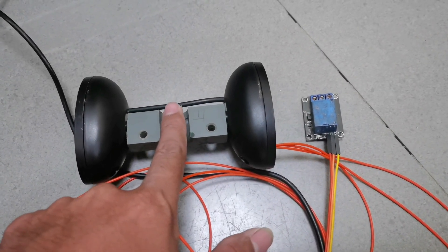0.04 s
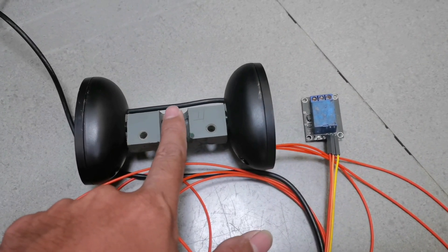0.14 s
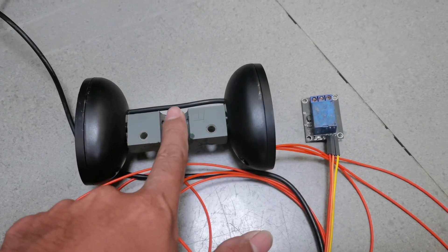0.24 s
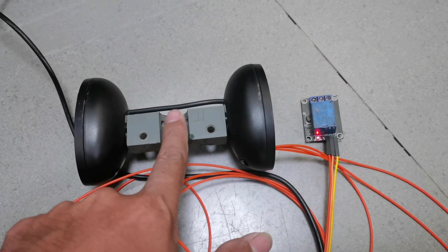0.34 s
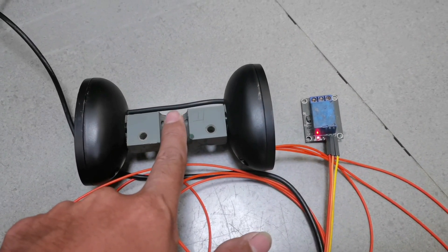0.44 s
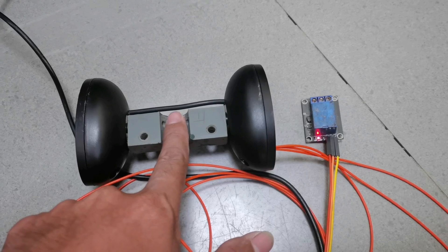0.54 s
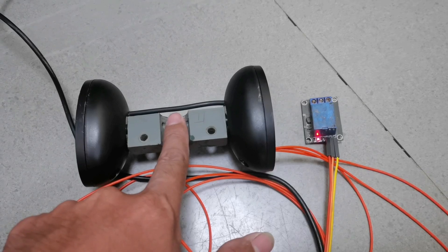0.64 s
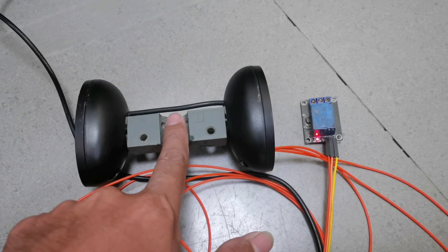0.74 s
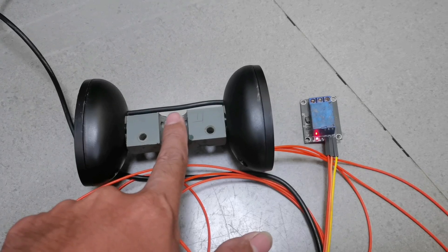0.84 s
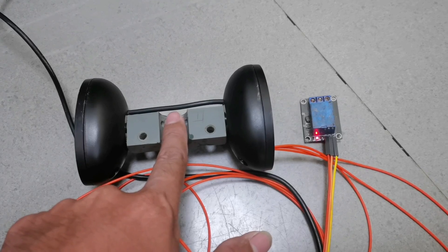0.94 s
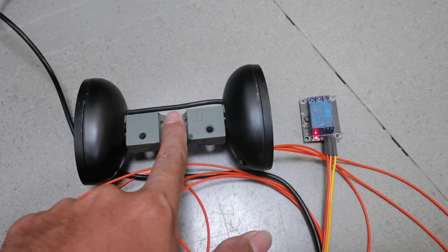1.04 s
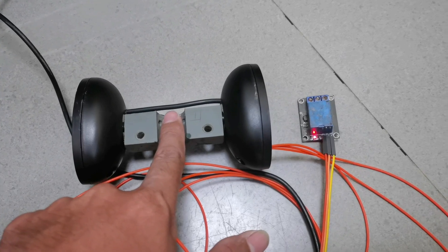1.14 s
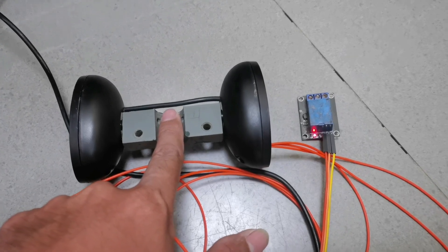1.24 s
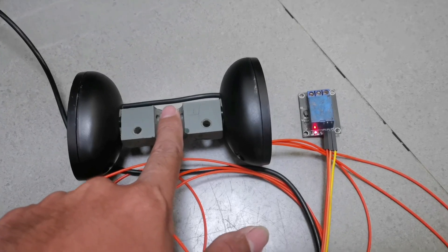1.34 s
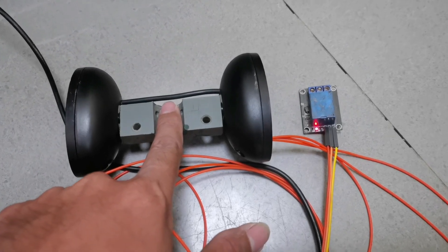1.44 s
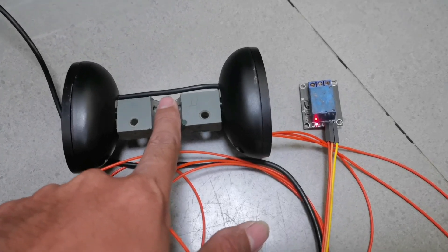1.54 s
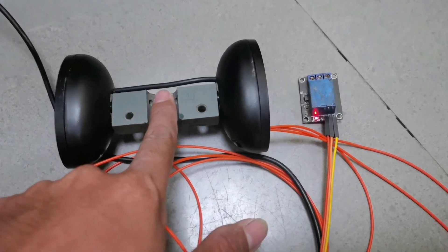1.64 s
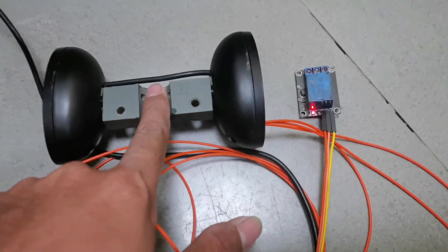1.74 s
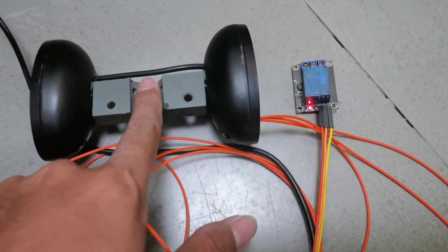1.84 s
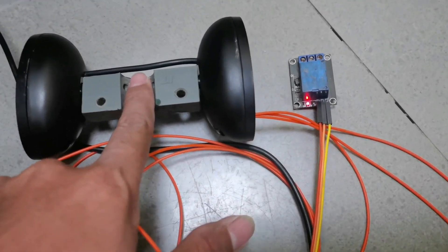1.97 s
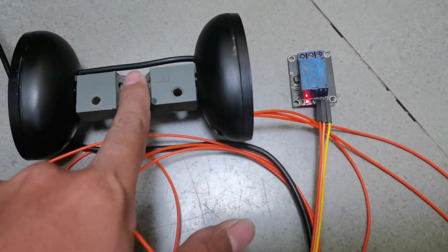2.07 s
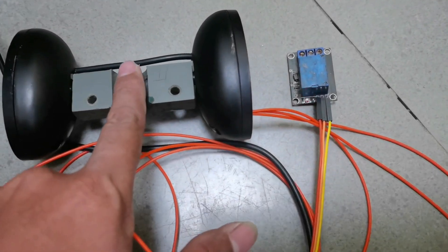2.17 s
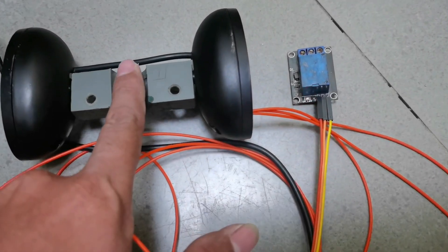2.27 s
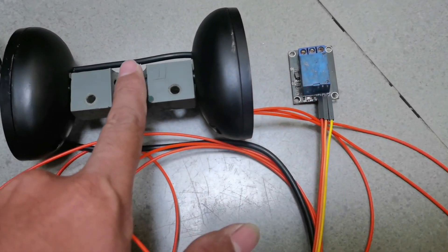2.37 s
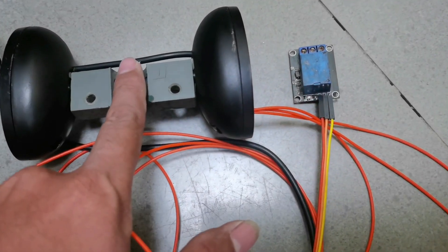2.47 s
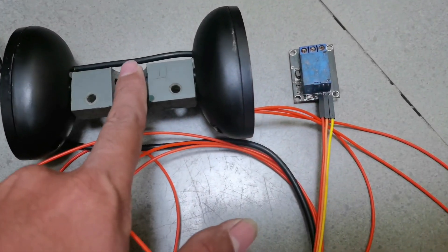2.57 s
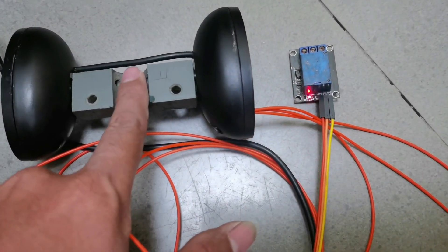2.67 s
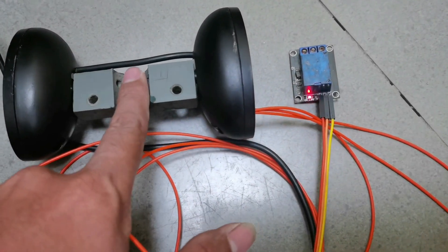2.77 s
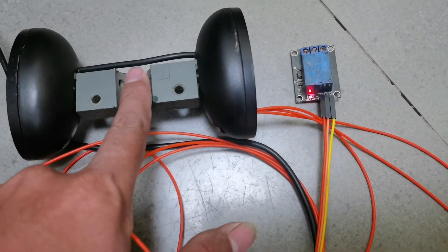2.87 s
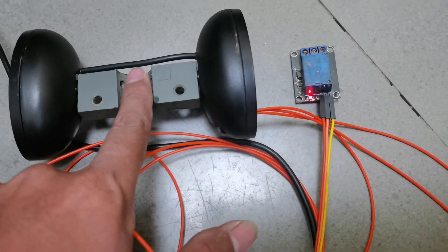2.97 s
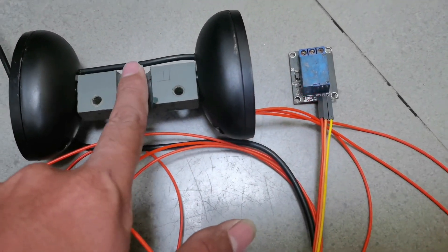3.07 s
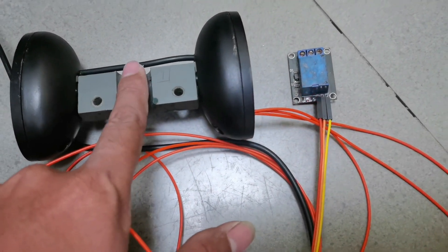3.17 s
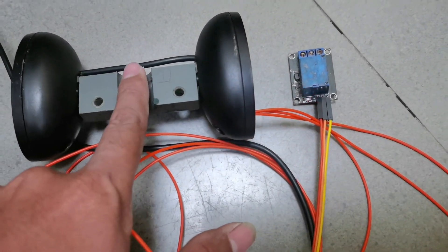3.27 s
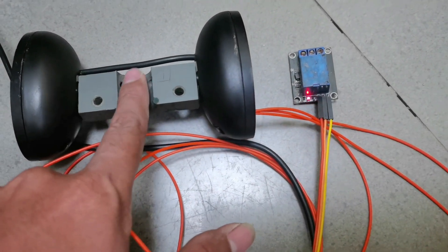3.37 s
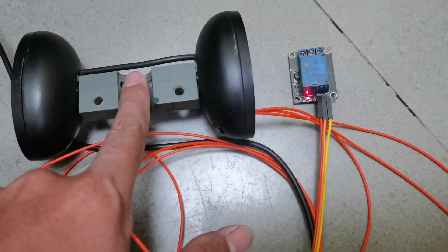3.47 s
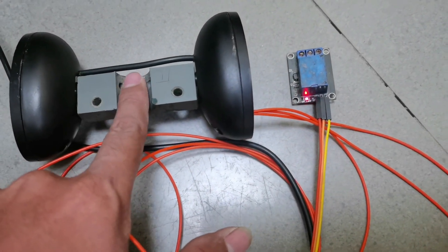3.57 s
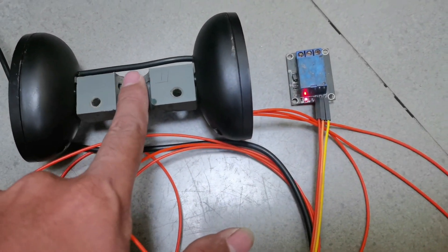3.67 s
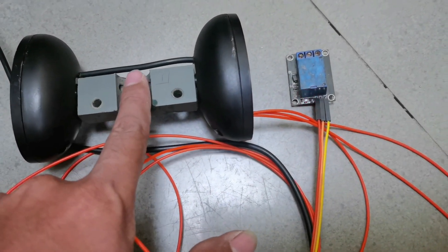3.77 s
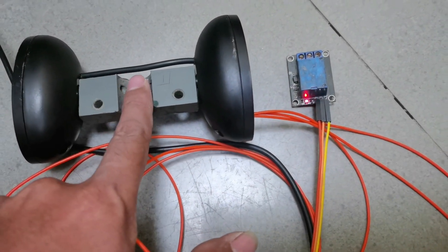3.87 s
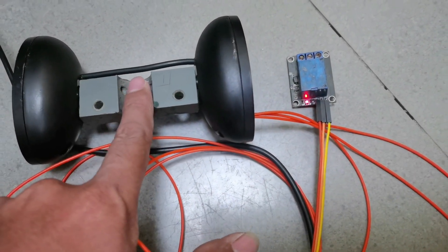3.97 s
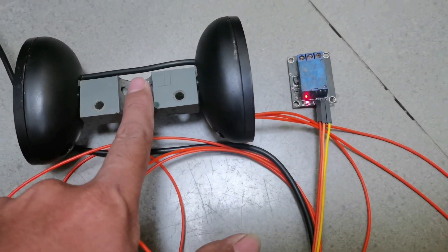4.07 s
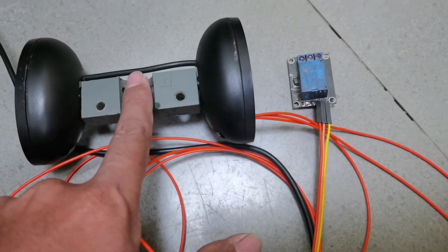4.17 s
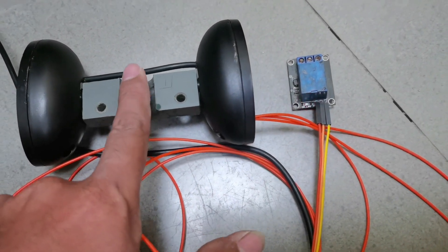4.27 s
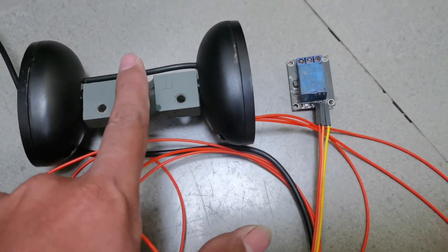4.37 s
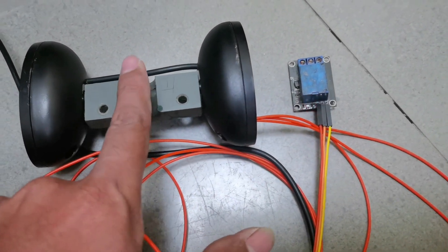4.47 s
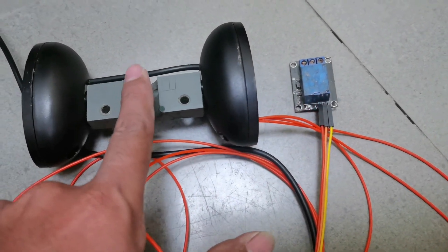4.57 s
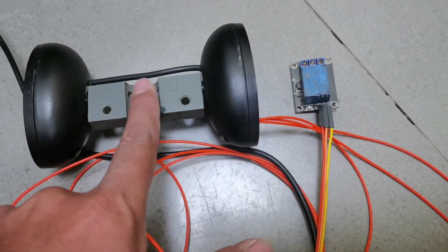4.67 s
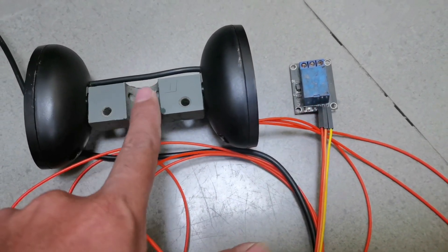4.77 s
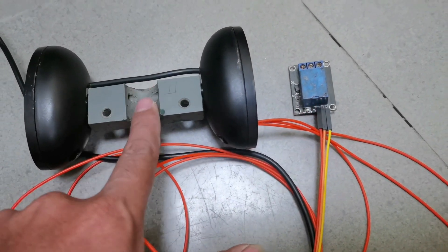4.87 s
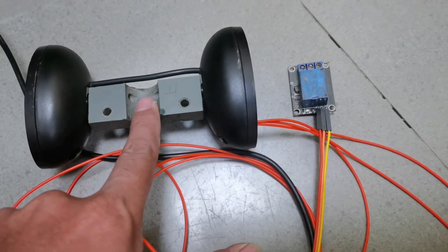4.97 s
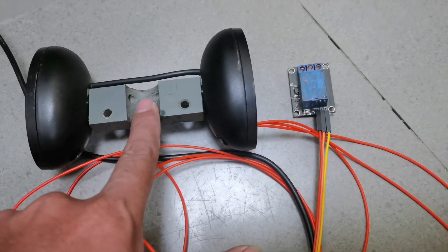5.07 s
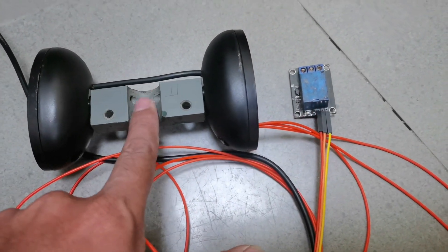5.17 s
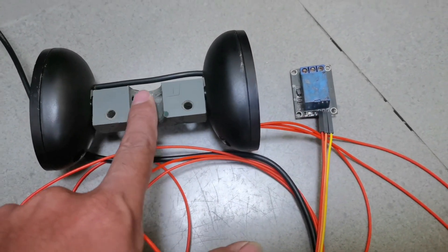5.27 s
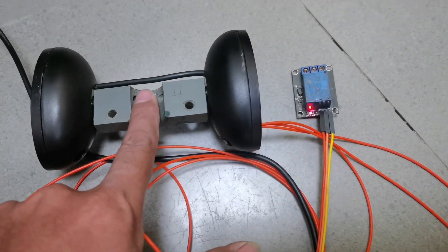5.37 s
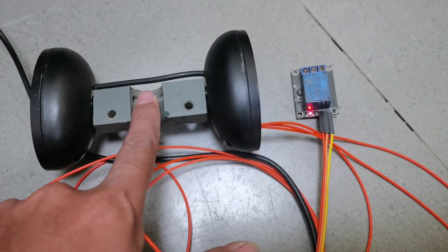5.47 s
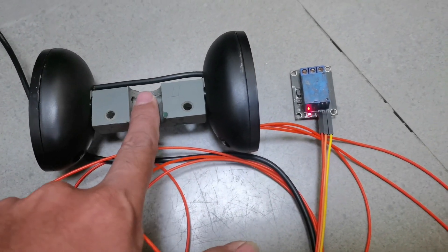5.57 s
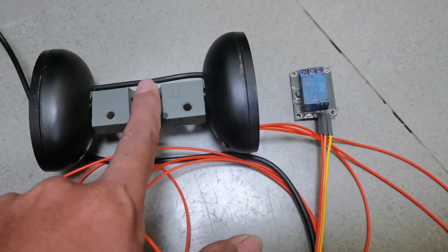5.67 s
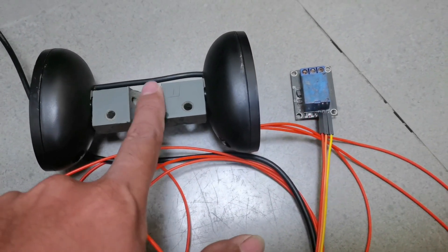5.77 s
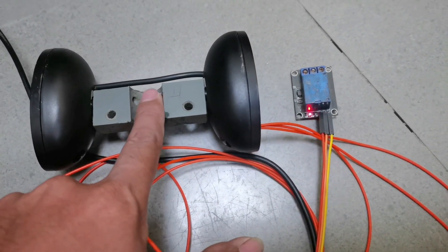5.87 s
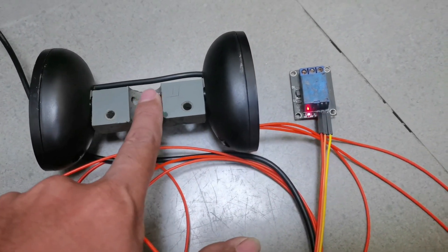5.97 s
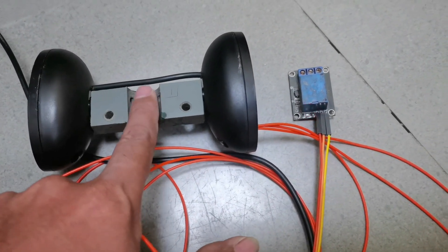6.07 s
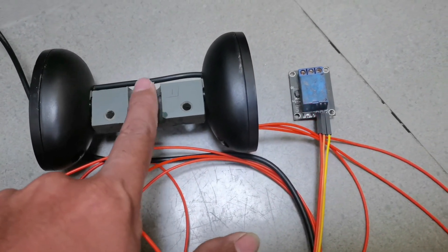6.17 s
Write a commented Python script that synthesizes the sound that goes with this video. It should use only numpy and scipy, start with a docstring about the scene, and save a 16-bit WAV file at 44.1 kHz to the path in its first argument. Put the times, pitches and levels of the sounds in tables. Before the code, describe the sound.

A small relay clicks on and off at uneven intervals in a hard room, over faint rumble and distant traffic.

```python
"""A hard room with a tiled floor, where a small relay is switched on and off from a device wired to it.
Pulling in, the armature hits the core with one sharp snap; let go, it springs back and chatters on
the contacts. Each click rings out in the room, and one faint tick comes from further off.
Underneath lie a low rumble, a wavering drone and the slow swell of distant traffic."""
import sys
import numpy as np
from scipy import signal
from scipy.fft import rfft, irfft, next_fast_len
from scipy.io import wavfile

SR = 44100
rng = np.random.default_rng(int(sys.argv[2]) if len(sys.argv) > 2 else 0)


def dump_mix(stems):
    """Bounce the given channels to the path in sys.argv[1] as a 16-bit WAV at rate SR."""
    frames = np.atleast_2d(stems).T  # one column per channel
    limited = np.clip(frames, -1, 1)  # hard clip at full scale
    pcm = np.round(limited * 32767).astype(np.int16)
    wavfile.write(sys.argv[1], SR, pcm)


N = 274169


def from_db(db):
    """Decibels to gain."""
    return 10 ** (np.asarray(db) / 20)


def rms_one(x):
    """Scale to unit power."""
    return x / np.sqrt(np.mean(x ** 2) + 1e-20)


def in_time(rows):
    """Each column of an automation curve at every sample."""
    s, *columns = np.transpose(rows)
    return [np.interp(np.arange(N) / SR, s, c) for c in columns]


def at_hz(rows, hz):
    """Each column of a table, read on a log-frequency axis."""
    points, *columns = np.transpose(rows)
    return [np.interp(np.log(hz), np.log(points), c) for c in columns]


def pan(db):
    """Left and right gains for a balance in dB; positive leans left."""
    return from_db(np.array([[.5], [-.5]]) * db)


def add(out, sound, s):
    """Mix a stereo sound in at a time."""
    start = max(round(s * SR), 0)
    out[:, start:start + sound.shape[1]] += sound[:, :max(out.shape[1] - start, 0)]


def poles(hz, width_hz):
    """Denominator of a damped resonance."""
    r = np.exp(-np.pi * width_hz / SR)
    return np.array([1, -2 * r * np.cos(2 * np.pi * hz / SR), r * r])


def resonate(x, hz, width_hz):
    """A resonance with unity gain at its peak."""
    a = poles(hz, width_hz)
    return signal.lfilter(np.array([1, 0, -1]) * (1 - a[2]) / 2, a, x)


def drift(rate_hz):
    """Slow random wander with a spread of 1."""
    step, run_in = 40, 2000
    r = np.exp(-2 * np.pi * step * rate_hz / SR)
    white = rng.standard_normal(N // step + run_in + 2)
    slow = signal.lfilter([1], [1, -2 * r, r * r], white)[run_in:]
    return np.interp(np.arange(N) / step, np.arange(len(slow)), rms_one(slow))


def air_noise(spectrum):
    """A diffuse noise bed of a given colour at unit power: narrow in the bass, wide in the treble."""
    # Stereo image of the ambience. Each row: frequency in Hz, likeness from -1 to 1, balance in dB.
    image = [(40, 0.81, 0), (150, 0.91, 4), (300, .8, 4), (678, 0.62, 3.5), (1270, -0.15, 1),
             (2647, 0.012, -5.5), (4040, -0.079, -11), (6000, 0, -0.5), (14430, -0.26, -2)]
    hz = np.maximum(np.fft.rfftfreq(next_fast_len(N), 1 / SR), 1)
    alike, balance_db = at_hz(image, hz)
    octaves_outside = np.abs(np.log2(hz / np.clip(hz, spectrum[0][0], spectrum[-1][0])))
    colour = from_db(at_hz(spectrum, hz)[0] - 60 * octaves_outside)
    mid, side = rfft(rng.standard_normal((2, next_fast_len(N))))
    pair = np.sqrt(1 + alike) * mid + np.sqrt(1 - alike) * side * [[1], [-1]]
    return rms_one(irfft(pair * colour * pan(balance_db))[:, :N])


def room_tone():
    """A steady deep rumble under the room's low drone, which wavers at random."""
    # Colours of the rumble and the drone. Each row: frequency in Hz, relative density in dB.
    rumble_colour = [(22, -8), (41, 3), (62, -4), (90, -1.5), (122, -4.5)]
    drone_colour = [(115, -11.5), (150, -0.5), (203, -0.5), (238, -1), (265, -10), (290, -7), (336, -21.5),
                    (420, -19)]
    # The drone's fader ride. Each row: time in seconds, relative level in dB.
    drone_ride = [(0, -49), (1.92, -52), (2.1, -47.5), (2.45, -47.8), (2.92, -53.5), (3.15, -48.5),
                  (4.9, -49.4), (5.7, -48), (6.22, -51)]
    waver_db = 2 * drift(rate_hz=5.7)
    drone_db = in_time(drone_ride)[0] + waver_db + 0.77
    return from_db(-53) * air_noise(rumble_colour) + from_db(drone_db) * air_noise(drone_colour)


def distant_traffic():
    """Roar and tyre hiss swell and fade; a faint top hiss follows the tyres part of the way."""
    # The swells. Each row: time in seconds, relative levels of the roar and of the tyres in dB.
    swells = [(0, -54.5, -63.5), (.5, -51, -56.5), (.85, -53, -56), (1.19, -48.7, -51.5), (1.62, -53, -61),
              (2.13, -53, -64.5), (2.48, -50.5, -55), (2.92, -54, -63.5), (3.15, -52.5, -62),
              (3.62, -52, -58.5), (3.95, -48.7, -54), (4.44, -49.6, -58), (4.7, -51.5, -60.5),
              (4.97, -49, -55), (5.27, -51, -55.5), (5.86, -49, -53), (6.03, -48, -49.5),
              (6.22, -48, -52.5)]
    # Colours of the roar, tyres and top hiss. Each row: frequency in Hz, relative density in dB.
    roar_colour = [(330, -16.5), (420, -10), (510, -6), (640, -5), (722, 0), (790, -3.5), (930, -7.5),
                   (1030, -5.5), (1100, -2), (1190, -4), (1600, -6), (1880, -7.5), (2300, -12.5)]
    tyre_colour = [(1700, -22.5), (2200, -7), (2700, -0.5), (3300, -8), (4200, -7), (4650, -17.5),
                   (5200, -28), (6900, -23), (7450, -16.5), (8100, -25.5), (9100, -21.5), (9600, -46.5)]
    hiss_colour = [(4500, -13.5), (7500, -6), (10000, -5.5), (12800, 2.5), (15600, 0), (16100, -37.5)]
    roar_db, tyre_db = in_time(swells)
    hiss_db = -78.5 + .3 * (tyre_db - tyre_db.mean())
    roar = from_db(roar_db + 2.0) * air_noise(roar_colour)
    tyres = from_db(tyre_db + 3.5) * air_noise(tyre_colour)
    return roar + tyres + from_db(hiss_db) * air_noise(hiss_colour)


def room_response(early_db, early_t60, build_s, size=26000):
    """Dense echoes: near surfaces die quickly, the walls slowly, the treble first."""
    # The reverb. Each row: frequency in Hz, level in dB, seconds to fall 60 dB, balance in dB.
    reverb = [(2520, 8, 0.61, -6), (4210, 8, 0.64, -7.5), (5000, -5, 0.38, 0), (7200, 0, 0.47, -7.5),
              (9100, -7.5, .44, 2.5), (12000, -5.5, 0.29, -0.5), (15500, -4.5, .28, 0.5),
              (16800, -22.5, 0.18, -6)]
    t, out = np.arange(size) / SR, 0
    hz = np.fft.rfftfreq(size, 1 / SR)
    white = rfft(rng.standard_normal((2, size)))
    edges_hz = np.geomspace(1500, 18000, 26)
    for low, high in zip(edges_hz, edges_hz[1:]):
        level_db, t60, side_db = at_hz(reverb, np.sqrt(low * high))
        fade = from_db(-60 * t / t60) + from_db(early_db - 60 * t / early_t60)
        fade = fade * (1 - np.exp(-(t / build_s) ** 2))
        band = irfft(white * ((hz >= low) & (hz < high)))
        out = out + band * fade / np.linalg.norm(fade) * from_db(level_db) * pan(side_db)
    return out


def far_tick():
    """A small hard tick further off, heard through the room's echoes."""
    # The tick's cue. Each row: start in seconds, relative strength in dB.
    cues = [(0.149, 1.5)]
    out = np.zeros((2, N))
    for s, db in cues:
        echoes = room_response(early_db=-25.5, early_t60=.2, build_s=0.0061)
        tick = resonate(echoes, hz=7400, width_hz=920)
        tick = resonate(tick, hz=8800, width_hz=1300)
        add(out, from_db(db) * tick, s)
    return out


def brighten(modes, db_per_octave, pivot_hz=7800):
    """Tilt the modes about a pivot, so a click sounds a little brighter or duller."""
    return [(hz, width, db + db_per_octave * np.log2(hz / pivot_hz), side)
            for hz, width, db, side in modes]


def ring(modes, beaming, vary_db, size=2048):
    """One touch rings every mode; each mode beams to its own side."""
    blow, out = signal.unit_impulse(size), 0
    for k, (hz, width_hz, level_db, side_db) in enumerate(modes):
        gain = (-1) ** k * from_db(level_db + vary_db * rng.normal())
        out = out + gain * pan(beaming * side_db) * resonate(blow, hz, width_hz)
    return out


def click(modes, touches, beaming, lead_s, jitter_s=0.00017, size=2600):
    """One stroke of the armature: a few unevenly spaced touches on the same modes."""
    out, touch = np.zeros((2, size)), ring(modes, beaming, vary_db=1.5)
    for after_s, db in touches:
        slip_s = jitter_s * rng.normal() * (after_s != 0)   # the main blow stays on cue
        add(out, from_db(db) * touch, lead_s + after_s + slip_s)
    return out


def smear(x, hz, width_hz):
    """An all-pass delays the ring around one pitch, spreading the click into a denser snap."""
    a = poles(hz, width_hz)
    return signal.lfilter(np.convolve(a[::-1], a[::-1]), np.convolve(a, a), x)


def relay(strokes, modes, touches, direct_db, wall_db, room_db, smear_width_hz):
    """Each stroke arrives left, then right, then off a close wall on the right and from the room."""
    out = np.zeros((2, N))
    lead_s, right_lag_s, wall_echo_s = .004, .0003, .0026
    for s, db, bright_db in strokes:
        start, struck = s - lead_s, brighten(modes, bright_db)
        near = from_db(db + direct_db) * click(struck, touches, beaming=0.99, lead_s=lead_s)
        near = smear(near, hz=8200, width_hz=smear_width_hz)
        near = smear(near, hz=13210, width_hz=1100)
        left, right = near * [[1], [0]], near * [[0], [1]]
        add(out, left, start)
        add(out, right, start + right_lag_s)
        # a hand-held perspective: the echo path shifts from click to click
        add(out, from_db(wall_db) * right, start + wall_echo_s + rng.uniform(0, 0.00072))
        # the room gathers sound from all directions, so it keeps only part of the beaming
        spread = click(struck, touches, beaming=0.55, lead_s=lead_s)
        room = room_response(early_db=8.5, early_t60=.11, build_s=0.0077)
        add(out, from_db(db + room_db) * signal.fftconvolve(spread, room, axes=1), start)
    return out


def pull_ins():
    """Switching on: the contacts meet softly, then the armature hits the core with one snap."""
    # The snaps. Each row: time in seconds, relative strength in dB, tilt in dB per octave.
    strokes = [(.5516, -2, -0.5), (2.8179, -1.7, 0), (3.5967, -2.4, 1.5), (4.0674, -1.7, 0),
               (5.5869, -2, -1.5), (6.0583, -3.5, 0.5)]
    # The closed relay's ring. Each row: pitch and width in Hz, level and full-beam balance in dB.
    modes = [(4280, 390, -11, 0.5), (5300, 680, 5, 10), (5927, 130, 12.5, 8), (7120, 220, 16.5, -0.5),
             (7640, 373, 16, -4.5), (7890, 122, 20, 18), (8500, 290, 12.5, 14), (9434, 445, 21.5, 5),
             (9590, 830, 15.5, 10), (10950, 1100, 2, -7), (11500, 670, -0.5, 5.5), (12650, 520, 8.5, -1.7),
             (13500, 502, 0.5, 17.5), (15392, 257, 3.5, 4.5)]
    # Contact, then landing. Each row: seconds after the blow, relative level in dB.
    touches = [(-.0019, -25.5), (0, 0.5)]
    return relay(strokes, modes, touches, direct_db=0.0, wall_db=-8.5, room_db=0.5, smear_width_hz=1300)


def drop_outs():
    """Switching off: the armature springs back and chatters on the contacts."""
    # The releases. Each row: time in seconds, relative strength in dB, tilt in dB per octave.
    strokes = [(2.3291, 0.2, -0.5), (3.2403, -.4, 0), (3.9084, -0.5, 1), (4.3358, -0.3, -1.5),
               (5.8416, -1.5, 0)]
    # The open relay's ring. Each row: pitch and width in Hz, level and full-beam balance in dB.
    modes = [(3580, 470, -4, 1.5), (4570, 330, -4.5, -14), (5460, 445, -2.5, 13), (6510, 392, 3, 7.5),
             (6740, 110, 11.5, 2), (7190, 30, 15.5, 0), (7500, 150, 12.5, -19), (7740, 300, 13.5, 17.5),
             (8420, 310, 9.5, 14), (9007, 150, 20.5, 9.5), (9170, 1100, 6, 13), (10300, 270, 5.5, -0.5),
             (11130, 560, 5.5, -8.5), (11700, 1500, 2, 8.5), (13870, 800, -3, 8), (15420, 350, 1, 3.5)]
    # Release, blow and two bounces. Each row: seconds after the blow, relative level in dB.
    touches = [(-.0011, -21), (0, -3), (.0029, -8.5), (.0047, -8.5)]
    return relay(strokes, modes, touches, direct_db=-0.5, wall_db=-1.5, room_db=0.6, smear_width_hz=5790)


def scene():
    """The relay's clicks and the far tick over the ambience."""
    return pull_ins() + drop_outs() + far_tick() + room_tone() + distant_traffic()


def record(dry):
    """A steep high cut on the whole mix."""
    cutoff_hz = 16700
    return signal.sosfilt(signal.ellip(10, .1, 80, cutoff_hz, fs=SR, output="sos"), dry)


dry = scene()
out = record(dry)
dump_mix(out)
```